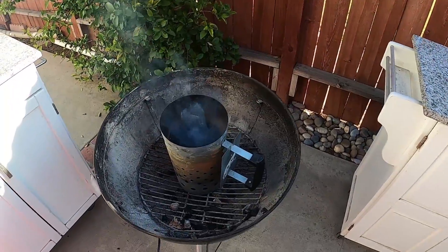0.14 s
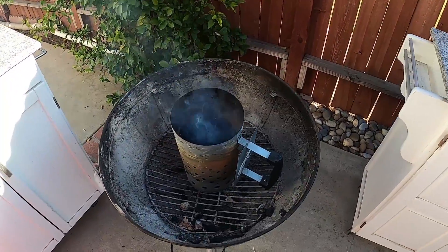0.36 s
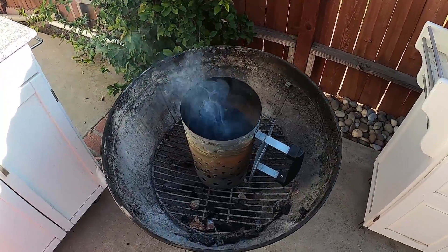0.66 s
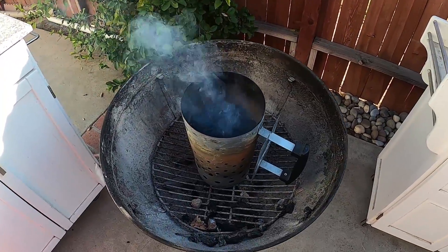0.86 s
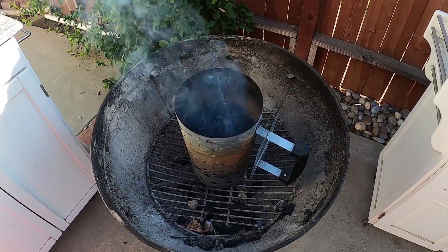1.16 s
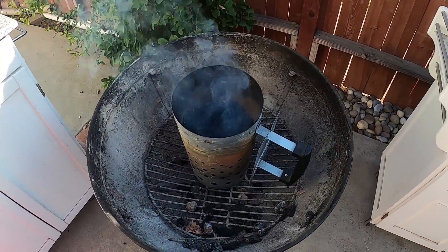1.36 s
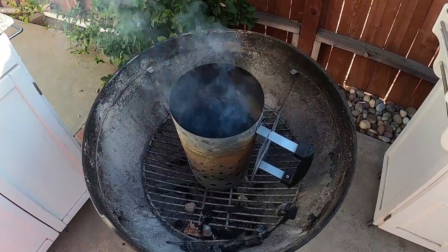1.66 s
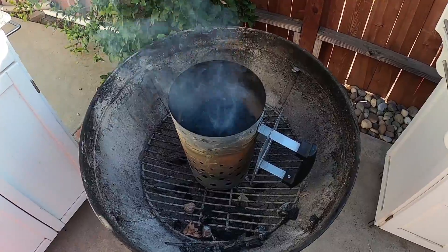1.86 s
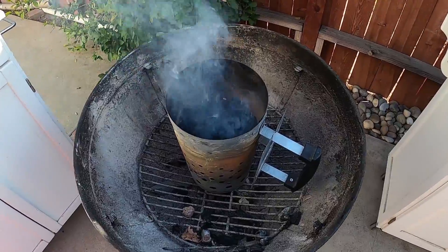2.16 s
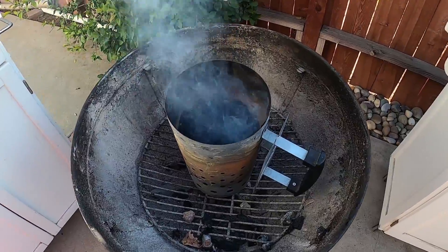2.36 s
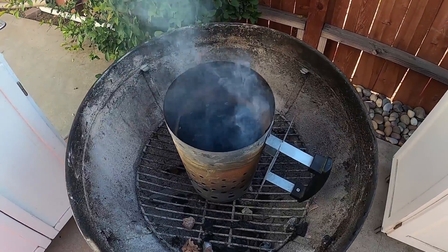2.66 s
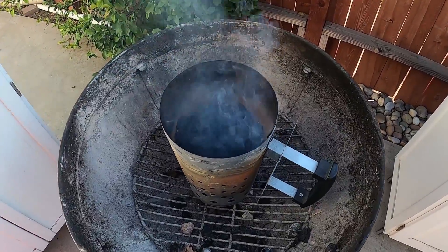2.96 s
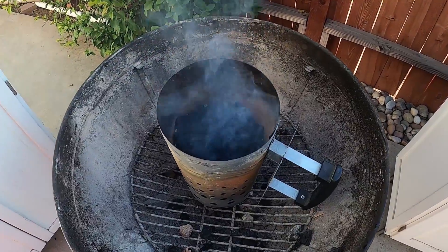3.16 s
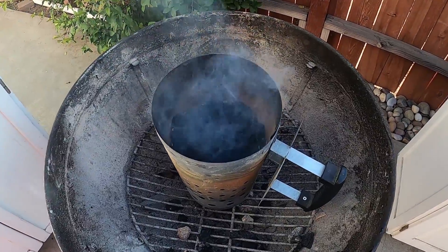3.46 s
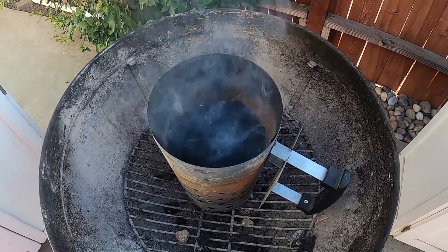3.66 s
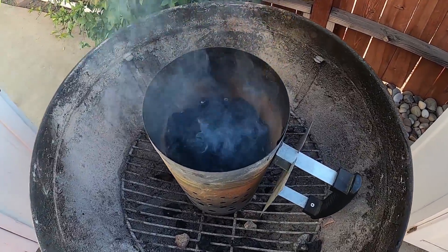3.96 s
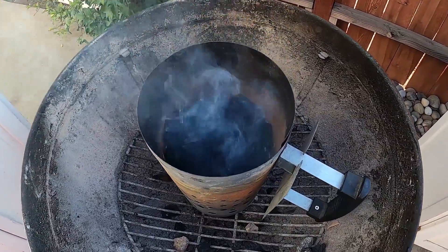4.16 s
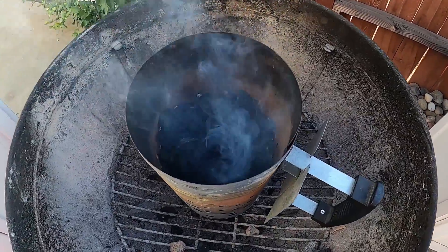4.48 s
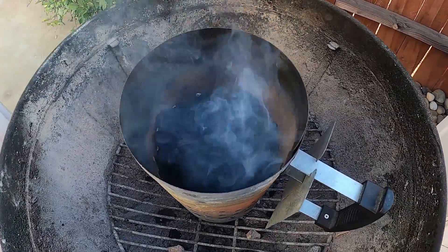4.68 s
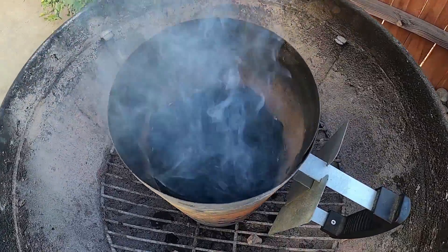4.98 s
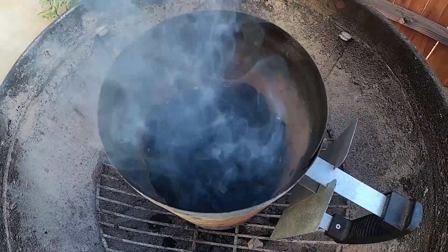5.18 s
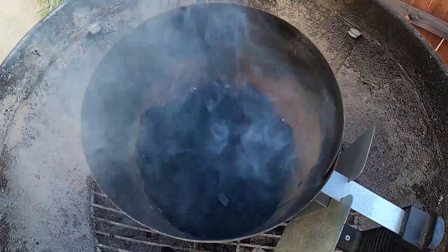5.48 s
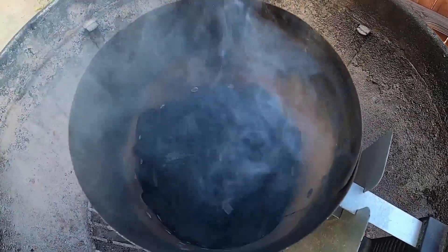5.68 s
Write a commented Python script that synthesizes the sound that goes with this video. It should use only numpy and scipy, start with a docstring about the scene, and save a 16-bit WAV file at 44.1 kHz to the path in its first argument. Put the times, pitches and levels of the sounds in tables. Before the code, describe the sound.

Charcoal snaps, ticks and tinkles in a metal chimney over a low outdoor rumble and distant motor hum, growing closer and hollower.

```python
"""A patio with a charcoal chimney starter: the microphone starts at a distance and leans in toward its mouth.
Behind lie filtered-noise rumble and wash and a distant motor's wavering tone; a soft draught and a faint sizzle
grow. Scuffs, and the fading tail of a knock at the very start, are gritty noise bursts, one with a ringing
metallic clack; soft knocks are short tones with a noise edge. Top coals snap (click, brief notes, echo); deeper
ones crack, crumble and tinkle as rough tones, tiny fractures and tube-shaped noise. Thin high pings, perhaps a
small mechanism near the microphone, sound one pure note."""
import sys
import numpy as np
from scipy import signal
from scipy.fft import rfft, irfft, next_fast_len
from scipy.io import wavfile
from scipy.ndimage import uniform_filter1d, map_coordinates

SR = 44100
rng = np.random.default_rng(int(sys.argv[2]) if len(sys.argv) > 2 else 0)


def transcribe(u):
    """Save the signal u as a 16-bit wav file named by the first command-line argument.

    u: samples, shape (n,) or (channels, n), limited to [-1, 1]; the rate is SR.
    q: integer samples, one column per channel.
    """
    v = np.clip(np.atleast_2d(u).T, -1, 1)
    q = np.round(v * 32767).astype(np.int16)
    wavfile.write(sys.argv[1], SR, q)


N = 257103

# Stereo likeness of the noises: (frequency [Hz], left-right correlation [-1 to 1])
STEREO_LIKENESS = [(25, 0.83), (80, 1), (250, 0.93), (500, 0.83), (1000, 0.65), (4000, 0.19), (8000, 0.65),
                   (12000, 0.68)]
# Left port over the right: (frequency [Hz], level [dB])
PORT_BALANCE = [(60, 0.5), (500, 1.4), (2700, 2), (4700, 1.4), (8000, -0.5), (11000, -2)]
# Phase by which the right port leads the left: (frequency [Hz], phase [rad])
PORT_LEAD = [(30, 0.12), (500, 0.043), (2000, 0.6), (4300, 0.94), (6000, 1.05), (8200, 1.26), (12000, 1.2)]
TOP_HZ = 15000  # nothing is kept from here up
# How far the microphone has leaned into the bowl: (time [s], share [0-1])
LEAN = [(0, 0), (2.3, 0.12), (3.3, 0.6), (4.6, 0.79), (5.1, 0.96), (5.55, 1)]
BEAMING = 4.26  # the tube sends its sound upward: it is heard as this power of the lean

# Outdoor rumble: (time [s], level [dB])
RUMBLE_LEVEL = [(0.0, -40), (0.9, -39.5), (1.6, -37), (2.3, -39.5), (2.8, -39), (4.3, -39.5), (5.0, -37.5),
                (5.83, -35.5)]
# Outdoor wash: (time [s], level [dB])
WASH_LEVEL = [(0.0, -52.5), (0.65, -54), (0.95, -50.5), (1.2, -53.5), (2.1, -51.5), (2.4, -56.5),
              (3.5, -54.5), (4.05, -56), (5.1, -57.5), (5.83, -58)]
# Spectra of the background noises, only their shape counts: (frequency [Hz], relative level [dB])
RUMBLE_SPECTRUM = [(12, -12), (25, -2.5), (40, 1), (58, 3.5), (80, -6), (110, -1), (150, -3), (200, -10.5),
                   (235, -13.5), (280, -30), (500, -64), (2000, -120)]
WASH_SPECTRUM = [(30, -65.5), (120, -21), (220, 4), (320, 4), (450, -4.5), (560, -5), (730, -10),
                 (830, -20), (1300, -31), (2000, -53.5), (8000, -92.5)]
WASH_IN_BOWL_SPECTRUM = [(30, -49.5), (120, -10.5), (220, -4.5), (290, 0.5), (380, 4), (430, 2), (480, 0.5),
                         (600, -2.5), (800, -9.5), (1300, -38.5), (2000, -45.5), (8000, -94.5)]
DRAUGHT_SPECTRUM = [(100, -61.5), (350, -15.5), (520, 1.5), (800, 4.5), (1350, 6.5), (1750, -3),
                    (2200, -9.5), (3000, -29.5), (6000, -40.5), (14000, -64.5)]
SIZZLE_SPECTRUM = [(200, -51.5), (1500, -9), (2700, -4), (3500, -5), (5000, -3), (6200, -4), (7900, -4.5),
                   (8700, -10), (9300, -14.5), (10100, -14.5), (11000, -28.5), (14000, -50), (20000, -75.5)]
# Hollow resonances of the air in chimney and bowl: (frequency [Hz], width [Hz], relative level [dB])
FLUE_MODES = [(480.6, 43, 14.5), (570, 120, 6.5), (770, 110, -3), (946, 58, 3), (1026.6, 10, 12.5),
              (1138, 59, 4), (1550, 280, -14)]
DRAUGHT_DB, DRAUGHT_NEAR_DB = -68.5, 9.5  # level before the lean, rise at full lean
SIZZLE_DB, SIZZLE_NEAR_DB = -73.5, 4  # likewise

# Distant motor: (time [s], pitch [Hz], fundamental level [dB], octave level [dB])
MOTOR = [(0.0, 82.05, -32, -54), (1.1, 83.34, -30, -48), (2.0, 83, -26.5, -43.5),
         (2.6, 83.94, -32.5, -47.5), (3.3, 83.64, -34, -56), (3.8, 83.7, -30.5, -55),
         (4.4, 84.16, -33.5, -64.5), (4.95, 83.74, -29.5, -53.5), (5.83, 83.87, -32, -51)]
# Brief dips in the level of the drone's fundamental: (time [s], depth [dB], half width at 1/e of the depth [s])
DRONE_DIPS = [(0.247, 25, 0.062), (0.58, 9.5, 0.055), (0.939, 29.5, 0.022), (1.252, 7.5, 0.027),
              (3.92, 8, 0.053), (4.125, 21, 0.039), (4.348, 20, 0.031), (4.51, 6.5, 0.04)]
# Faint distant whines: (frequency [Hz], level [dB], loudest time [s], half width at 1/e [s])
WHINES = [(374.7, -63.5, 2.53, 1.84), (417, -64, 1.3, 0.45), (317.3, -62, 2.4, 0.6)]

# Scuffs on the paving, the first row being the fading tail of a knock just before the start: (time [s], level
# [dB], decay time to -60 dB [s], rise time [s])
SCUFFS = [(0.0, -50.5, 0.29, 0.00061), (0.3548, -31.5, 0.051, 0.0092), (0.374, -56.5, 0.95, 0.0015),
          (0.474, -47.5, 0.028, 0.001), (0.57, -55, 0.014, 0.00043), (4.162, -57.5, 0.1, 0.004),
          (4.275, -60.5, 0.11, 0.0015)]
# Soft handling knocks: (time [s], level [dB], pitch [Hz], thud decay time to -60 dB [s], edge over level [dB])
KNOCKS = [(0.43, -45, 640, 0.043, -2.5), (4.6814, -32.5, 580, 0.011, -12), (4.8592, -39.5, 1117, 0.011, 2),
          (5.466, -54.5, 1200, 0.013, 12)]
# Spectra of scuff and knock edge: (frequency [Hz], relative level [dB])
SCUFF_SPECTRUM = [(200, -35), (500, 3), (1500, 9), (2500, 3), (3400, 1.5), (5000, -2.5), (6200, -3.5),
                  (7800, -7.5), (9300, -18), (10100, -21.5), (12000, -26.5), (15000, -45.5)]
KNOCK_SPECTRUM = [(100, -23), (400, -4), (1200, -2.5), (2600, -3), (4200, -5), (6000, -9.5), (9000, -21.5),
                  (15000, -53)]

# Thin high pings: (time [s], level [dB])
PINGS = [(0.589, -62), (0.873, -61.5), (1.043, -63), (1.208, -55.5), (1.2213, -47), (1.327, -37.5),
         (2.4742, -38), (2.554, -50), (2.72, -68), (3.0306, -38), (3.114, -47), (4.033, -60), (4.42, -53),
         (5.1587, -38.5), (5.1926, -47), (5.542, -56)]
PING_HZ = 7740

# Resonances of the loaded steel tube: (frequency [Hz], relative level [dB])
TUBE_MODES = [(3420, -7.5), (3570, -9), (3755, -7.5), (4170, -7.5), (4830, -11), (4965, 3), (6090, -8),
              (7100, -5), (7730, -2), (8085, 0), (8490, 0), (10100, -12)]
# Partials around a ring's main note: (frequency over its pitch [ratio], relative level [dB])
RING_PARTIALS = [(1, 13.5), (0.91, -8), (1.3, -5), (1.1, -12)]
# Notes of a bursting flake: (frequency over its pitch [ratio], relative level [dB])
FLAKE_NOTES = [(0.621, -9), (0.905, -2), (1.003, 2.5), (1.13, -11), (1.501, -11.5)]
# Spectra of crunch, fracture and click: (frequency [Hz], relative level [dB])
CRUNCH_SPECTRUM = [(100, -48), (1500, -3), (2600, -5), (3600, -9.5), (6200, -1.5), (8400, -6.5),
                   (9200, -8.5), (10100, -10), (11000, -10.5), (13000, -19), (15000, -39)]
FRACTURE_SPECTRUM = [(100, -50), (500, -40.5), (1800, -18.5), (2900, -17.5), (4200, -11), (5200, -5.5),
                     (7800, 4.5), (8800, -2.5), (10000, -7), (12500, -2), (15000, -28.5)]
CLICK_SPECTRUM = [(100, -31), (1500, -11.5), (3000, -13), (5000, 0.5), (8000, 3), (9000, -2), (12500, -6.5),
                  (15000, -17.5)]
# Bursts of fine crackle: (time [s], length [s], pitch [Hz], level [dB])
CRUMBLES = [(0.358, 0.02, 3340, -47.5), (1.12, 0.03, 5600, -70), (2.146, 0.043, 5160, -70.5),
            (2.234, 0.06, 5100, -69), (2.357, 0.026, 6360, -66), (2.635, 0.025, 6400, -65.5),
            (3.511, 0.05, 5870, -68), (3.602, 0.019, 5500, -67), (4.159, 0.027, 6200, -59),
            (4.276, 0.015, 3980, -52), (4.345, 0.03, 5400, -64.5), (4.571, 0.051, 5430, -57.5),
            (4.715, 0.029, 5400, -62.5), (4.773, 0.034, 5900, -66), (4.812, 0.04, 5530, -55.5),
            (4.878, 0.028, 4400, -57.5), (4.979, 0.032, 5400, -59), (5.065, 0.037, 5720, -61.5),
            (5.156, 0.054, 4340, -63), (5.595, 0.06, 5950, -63.5), (5.688, 0.031, 4300, -60)]
# Cracks down in the tube; the first four rows are the ring of a metallic clack within the scuff:
# (time [s], pitch [Hz], ring level [dB], crunch level [dB], ring decay to -60 dB [s])
CLACK_AND_CRACKS = [(0.355, 6000, -46, -52, 0.06), (0.368, 6200, -47.5, -55, 0.1),
                    (0.371, 4900, -47, -51, 0.11), (0.369, 10000, -58, -72, 0.11),
                    (0.737, 4900, -73, -80, 0.2), (1.2954, 4130, -51.5, -57, 0.15),
                    (1.332, 4108, -61, -66, 0.13), (1.412, 7980, -64.5, -71, 0.12),
                    (1.806, 8510, -56, -61, 0.12), (1.807, 3500, -61.5, -80, 0.1),
                    (1.837, 8500, -58.5, -67, 0.12), (1.991, 9930, -61, -74, 0.063),
                    (2.149, 4962, -62, -67, 0.08), (2.167, 4450, -64.5, -71, 0.08),
                    (2.244, 5370, -65, -69, 0.1), (2.358, 3490, -72, -78, 0.1),
                    (2.376, 4850, -60, -80, 0.13), (2.476, 4020, -69, -73, 0.1),
                    (2.91, 6100, -63.5, -72, 0.1), (2.9612, 8560, -65, -60, 0.096),
                    (3.033, 4070, -70, -77, 0.1), (3.123, 6580, -52.5, -64, 0.082),
                    (3.123, 9500, -63, -70, 0.11), (3.163, 8620, -61, -61, 0.1),
                    (3.166, 3590, -67, -80, 0.093), (3.2347, 3784, -65, -67, 0.099),
                    (3.282, 6500, -64.5, -64, 0.11), (3.3, 8280, -56.5, -64, 0.077),
                    (3.446, 6000, -52, -68, 0.14), (3.6496, 4060, -53, -73, 0.12),
                    (4.274, 3750, -46, -52, 0.17), (4.281, 4950, -54, -59, 0.25),
                    (4.277, 8440, -55, -59, 0.11), (4.758, 6076, -62, -74, 0.25),
                    (4.974, 6200, -54.5, -66, 0.079), (4.984, 8060, -58.5, -66, 0.08),
                    (5.521, 9900, -69, -71, 0.08), (5.59, 9930, -65, -59.5, 0.13),
                    (5.6915, 8006, -42, -55, 0.081), (5.692, 3430, -55.5, -64, 0.099)]
# Dry snaps of the top coals: (time [s], pitch [Hz], body level [dB], high note level [dB], click level [dB])
SNAPS = [(0.118, 7100, -61, -66, -68.5), (0.2068, 6630, -55, -64, -63), (0.315, 6860, -49, -54, -65),
         (0.5152, 5450, -52.5, -53, -60), (0.701, 6770, -62, -66, -70.5), (0.916, 6800, -64, -61, -72),
         (1.011, 5600, -64, -61, -67.5), (1.0768, 4940, -60.5, -75, -63.5), (1.114, 6730, -62, -61, -62.5),
         (1.199, 5160, -66, -70, -63.5), (1.228, 4900, -58, -60, -64), (1.2942, 4800, -28, -30.5, -40.5),
         (1.453, 7000, -56, -64, -68), (1.499, 5500, -59, -73, -66.5), (1.557, 5280, -43, -58, -49),
         (1.9574, 7270, -52.5, -62, -61.5), (2.139, 6850, -52.5, -56, -60.5), (2.1988, 6580, -51, -62, -62),
         (2.209, 5460, -50.5, -51, -56.5), (2.2602, 4300, -52.5, -74, -69.5),
         (2.855, 7150, -67, -74, -62.5), (3.013, 6404, -65, -72, -62), (3.0302, 5600, -53, -70, -62),
         (3.35, 6940, -55.5, -68, -68), (3.445, 6530, -49, -64, -62.5), (3.638, 6000, -54, -68, -58.5),
         (3.6457, 6100, -43.5, -38.5, -51), (3.776, 6760, -37.5, -40, -52), (3.917, 5940, -58, -58, -60.5),
         (4.1893, 5400, -52, -59, -62), (4.4033, 5400, -45.5, -38.5, -47),
         (4.8323, 6830, -44.5, -41.5, -52), (5.207, 4860, -48, -48, -48.5), (5.307, 6900, -56, -63, -66),
         (5.342, 6940, -52.5, -62, -66), (5.415, 7100, -56.5, -66, -69), (5.739, 6300, -59, -60, -59.5),
         (5.756, 7100, -57, -60, -63)]
SNAP_HIGH_HZ = 7530  # the high note that the snaps share


def amp(db):
    """Decibels to gain."""
    return 10 ** (np.asarray(db) / 20)


def unit(x):
    """x scaled to rms 1."""
    return x / np.sqrt(np.mean(x ** 2) + 1e-20)


def along(points, hz):
    """Read (frequency [Hz], value) points on a log frequency axis."""
    f, values = np.transpose(points)
    return np.interp(np.log(hz + 1), np.log(f + 1), values)


def curves(rows):
    """One value per sample for each column after the time."""
    times, *columns = np.transpose(rows)
    return [np.interp(np.arange(N) / SR, times, column) for column in columns]


def wobble(rate):
    """A smooth random curve with rate knots a second."""
    knots = rng.standard_normal(int(N * rate / SR) + 4)
    return map_coordinates(knots, [np.arange(N) * rate / SR])


def jagged(size, rate):
    """A random curve of straight lines between rate knots a second."""
    return np.interp(np.arange(size) * rate / SR, np.arange(1000), rng.standard_normal(1000))


def flutter(size, depth_db, rate=450):
    """A fast random swelling, as of many overlapping reflections."""
    return amp(depth_db * jagged(size, rate))


def peak(f, centre_hz, width_hz):
    """Gain of one resonance."""
    return 1 / (1 + (2 * (f - centre_hz) / width_hz) ** 2)


def peaks(f, notes, width_hz):
    """Summed gain of equally wide resonances at (frequency [Hz], gain) notes."""
    return sum(gain * peak(f, hz, width_hz) for hz, gain in notes)


def noise(gain, size):
    """Stereo noise of rms 1 with a gain per frequency; a shared and an opposed part set the ports' likeness."""
    m = next_fast_len(size + 2048)
    hz = np.fft.rfftfreq(m, 1 / SR)
    turn = np.arccos(np.clip(along(STEREO_LIKENESS, hz), -1, 1)) / 2
    spectra = rfft(rng.standard_normal((2, m))) * gain(hz) * [np.cos(turn), np.sin(turn)]
    mid, side = irfft(spectra, m)[:, :size]
    return unit(np.array([mid + side, mid - side]))


def coloured(spectrum, size=N):
    """Stereo noise shaped by (frequency [Hz], level [dB]) points."""
    return noise(lambda hz: amp(along(spectrum, hz)), size)


def patchy(x, depth_db):
    """Noise broken into brief patches of random strength, as from many tiny vents."""
    z = signal.stft(x, nperseg=256)[2]
    field = uniform_filter1d(rng.standard_normal(z.shape[1:]), size=4, axis=0)  # along frequency
    field = uniform_filter1d(field, size=7, axis=1)  # along time
    return unit(signal.istft(z * amp(depth_db * unit(field)), nperseg=256)[1][:, :N])


def rough_tone(hz, size, turns, rate=500):
    """A tone of rms 1 whose phase is jostled at random, by turns cycles."""
    return unit(np.sin(2 * np.pi * (hz * np.arange(size) / SR + turns * jagged(size, rate))))


def dying(t, t60, attack):
    """A rise multiplied by an exponential decay of 60 dB in t60 seconds."""
    return amp(-60 * t / max(t60, 1e-3)) * (1 - np.exp(-t / attack))


def add(track, s, sound):
    """Mix a sound into the track at time s."""
    start = min(max(round(s * SR), 0), N)
    track[:, start:start + sound.shape[1]] += sound[:, :N - start]


def scattered(count, range_db, low_hz, high_hz):
    """Strew small, mostly weak events over the whole time: (time [s], below the strongest [dB], pitch [Hz])."""
    when, size, pitch = rng.random((count, 3)).T
    times = (np.arange(count) + when) / count * N / SR
    return zip(times, range_db * np.sqrt(size), low_hz + (high_hz - low_hz) * pitch)


def nearness():
    """The lean into the bowl, and how far that brings the microphone into the tube's beam, both 0-1."""
    near = np.clip(curves(LEAN)[0], 0, 1)
    return near, near ** BEAMING


def outdoor_rumble():
    """Low noise of the open air, its level drifting slowly."""
    return amp(curves(RUMBLE_LEVEL)[0] + 1.4 * wobble(7)) * coloured(RUMBLE_SPECTRUM)


def outdoor_wash():
    """Broad noise of the yard; the bowl's reflection hollows it as the microphone leans in."""
    near, _ = nearness()
    yard = np.sqrt(1 - near) * coloured(WASH_SPECTRUM) + np.sqrt(near) * coloured(WASH_IN_BOWL_SPECTRUM)
    return amp(curves(WASH_LEVEL)[0] + 1.1 * wobble(11)) * yard


def drone():
    """A far motor's fundamental and weak octave; a constant waver tells most where the drone is faint."""
    hz, level_db, octave_db = curves(MOTOR)
    t = np.arange(N) / SR
    dip_db = sum(depth_db * np.exp(-((t - s) / width) ** 2) for s, depth_db, width in DRONE_DIPS)
    phase = 2 * np.pi * np.cumsum(hz) / SR + 0.23 * wobble(6.3)
    waver = wobble(17) * np.sin(phase) + 0.085 * wobble(17) * np.cos(phase)
    steady = amp(level_db) * unit(np.sin(phase))
    fundamental = amp(-dip_db) * (steady + amp(-45) * unit(waver))
    octave = unit(np.sin(2 * phase + 1.1 * wobble(7.2)))
    return fundamental + amp(octave_db + 2.2 * wobble(10)) * octave


def distant_whines():
    """Faint tones, jostled in phase and level, that swell and fade."""
    t, out = np.arange(N) / SR, np.zeros(N)
    for hz, db, s, width in WHINES:
        tone = unit(np.sin(2 * np.pi * hz * t + wobble(9.3)))
        out += amp(db + 0.97 * wobble(4.8)) * np.exp(-((t - s) / width) ** 2) * tone
    return out


def draught():
    """Soft air noise and the hollow resonances of chimney and bowl, growing as the mouth comes near."""
    _, beam = nearness()
    hollow = noise(lambda f: sum(amp(db) * peak(f, hz, width) for hz, width, db in FLUE_MODES), N)
    level_db = DRAUGHT_DB + DRAUGHT_NEAR_DB * beam + 1.1 * wobble(12)
    return amp(level_db) * (coloured(DRAUGHT_SPECTRUM) + hollow)


def sizzle():
    """Patchy high noise of the embers with slow and fast level changes, growing as the mouth comes near."""
    _, beam = nearness()
    level_db = SIZZLE_DB + SIZZLE_NEAR_DB * beam + 1.8 * wobble(25) + 0.3 * wobble(430)
    return amp(level_db) * patchy(coloured(SIZZLE_SPECTRUM), depth_db=2.0)


def scuffs():
    """Shoes scuff the gritty paving, and a knock just before the start fades out: decaying noise with a fast
    random roughness."""
    out, t = np.zeros((2, N)), np.arange(SR // 2) / SR
    for s, db, t60, rise in SCUFFS:
        grit = unit(flutter(len(t), depth_db=1.0, rate=900))
        add(out, s, amp(db) * coloured(SCUFF_SPECTRUM, size=len(t)) * dying(t, t60, rise) * grit)
    return out


def knocks(width_hz=700, edge_life=0.47):
    """Fingers knock softly near the microphone: a short thud with a noise edge of edge_life times its decay."""
    out, t = np.zeros((2, N)), np.arange(SR // 2) / SR
    for s, db, hz, t60, edge_db in KNOCKS:
        thud = 0.74 * np.sin(2 * np.pi * hz * t) + noise(lambda f: peak(f, hz, width_hz), size=len(t))
        edge = amp(edge_db) * coloured(KNOCK_SPECTRUM, size=len(t))
        knock = thud * dying(t, t60, 0.00034) + edge * dying(t, edge_life * t60, 0.00039)
        add(out, s, amp(db) * knock)
    return out


def ping(hold_s=0.0011, release_s=0.0066, click_db=-19, click_t60=0.033, echo_db=-27, echo_t60=0.16, width_hz=300):
    """A thin pure note starts with a tick, holds for an instant and fades, leaving a faint echo."""
    t = np.arange(SR // 8) / SR
    envelope = np.clip(1 - (t - hold_s) / release_s, 0, 1) * (1 - np.exp(-t / 0.00023))
    note = np.sin(2 * np.pi * PING_HZ * t) * envelope
    tick = amp(click_db) * coloured(FRACTURE_SPECTRUM, size=len(t))[0] * dying(t, click_t60, 0.0002)
    echo = amp(echo_db) * noise(lambda f: peak(f, PING_HZ, width_hz), size=len(t))
    return note + tick + echo * dying(t, echo_t60, 0.004)


def tube_noise(hz, size, width_hz=45, broad_db=-15, reach=1.9, luck_db=0.5):
    """The tube's resonances, stirred most near the pitch hz and at random strengths each time."""
    luck = luck_db * rng.standard_normal(len(TUBE_MODES))
    modes = [(mode, amp(db + extra)) for (mode, db), extra in zip(TUBE_MODES, luck)]

    def gain(f):
        broad = amp(broad_db + along(CRUNCH_SPECTRUM, f))
        return (peaks(f, modes, width_hz) + broad) * peak(f, hz, reach * hz)

    return noise(gain, size=size)


def crumble(length, hz, count=150, spread=0.15, cycles=9, size_db=4.0, fall_db=9, rise_s=0.002, tube_db=-2):
    """A crust crumbles: a run of tiny fractures, each a few cycles at its own pitch, fading fall_db per length."""
    t = np.arange(int(3 * length * SR)) / SR
    life = np.arange(SR // 200) / SR  # time within one fracture
    when = rng.random(count)
    size, pitch = rng.standard_normal((count, 1)), rng.standard_normal((count, 1))
    turns = hz * np.exp(spread * np.clip(pitch, -2, 2)) * life
    grains = amp(size_db * size) * np.sin(2 * np.pi * turns) * turns * np.exp(-2 * turns / cycles)
    starts = ((np.arange(count) + when) / count * len(t)).astype(int)
    places = starts[:, None] + np.arange(len(life))
    fractures = unit(np.bincount(places.ravel(), grains.ravel(), len(t))[:len(t)])
    sound = unit(fractures + amp(tube_db) * tube_noise(hz, len(t)))
    return sound * amp(-fall_db * t / length) * (1 - np.exp(-t / rise_s))


def ringing_crack(hz, ring_db, crunch_db, t60, width_hz=190, scatter_db=-3, twin_ratio=0.968, twin_db=-12,
                  crunch_life=0.9, build_up_s=0.0018, grit_db=-7, grit_t60=0.089):
    """A lump splits or metal clacks: two close notes beat over crunching tube resonances, with a fast flutter."""
    t = np.arange(SR // 4) / SR
    partials = [(ratio * hz, amp(db)) for ratio, db in RING_PARTIALS]
    scatter = noise(lambda f: peaks(f, partials, width_hz) * amp(along(CRUNCH_SPECTRUM, f)), size=len(t))
    note = rough_tone(hz, len(t), turns=0.1, rate=200)
    twin = amp(twin_db) * rough_tone(twin_ratio * hz, len(t), turns=0.13, rate=200)
    ring = amp(ring_db) * unit(note + twin + amp(scatter_db) * scatter)
    crunch = amp(crunch_db) * tube_noise(hz, len(t))
    # the onset is a short gritty burst around the pitch
    grit = noise(lambda f: peak(f, hz, hz / 4) * amp(along(CRUNCH_SPECTRUM, f)), size=len(t))
    sound = ring * dying(t, t60, build_up_s) + crunch * dying(t, crunch_life * t60, build_up_s)
    sound = sound + amp(ring_db + grit_db) * grit * dying(t, grit_t60, build_up_s)
    return sound * flutter(len(t), depth_db=1.0, rate=370)


def snap(hz, body_db, high_db, click_db, t60=0.018, click_t60=0.013, width_hz=680,
         echo_db=-24, echo_t60=0.16, click_echo_db=-20):
    """A flake bursts off: a click, the flake's brief notes and a high note, then a weak, ragged bowl echo."""
    t, rise = np.arange(SR // 8) / SR, 0.0004
    click = amp(click_db) * coloured(CLICK_SPECTRUM, size=len(t))
    notes = [(ratio * hz, amp(db + along(FRACTURE_SPECTRUM, ratio * hz))) for ratio, db in FLAKE_NOTES]
    body = amp(body_db) * unit(sum(gain * rough_tone(f, len(t), turns=0.25) for f, gain in notes))
    high = amp(high_db) * rough_tone(SNAP_HIGH_HZ, len(t), turns=0.33) / np.sqrt(2)
    direct = click[0] * dying(t, click_t60, rise) + (body + high) * dying(t, t60, rise)
    body_echo = amp(body_db + echo_db) * noise(lambda f: peaks(f, notes, width_hz), size=len(t))
    high_echo = amp(high_db + echo_db) * noise(lambda f: peak(f, SNAP_HIGH_HZ, width_hz), size=len(t))
    echo = body_echo + high_echo + amp(click_echo_db) * click
    return direct + echo * dying(t, echo_t60, 0.0039) * flutter(len(t), depth_db=4.0)


def small_coals(tick_db=-60.0, tinkle_db=-67, crumble_db=-71, tick_t60=0.024, tinkle_t60=0.11,
                life_spread=0.59, near_db=4):
    """Faint ticks, tinkles and runs of crackle at random moments, louder as the microphone nears."""
    out = np.zeros((2, N))
    for s, below, hz in scattered(count=70, range_db=6.5, low_hz=4480, high_hz=7850):
        db = tick_db - below
        click_db = db - 12 + 4 * rng.standard_normal()
        add(out, s, snap(hz, db, db - 8, click_db, t60=tick_t60 * rng.lognormal(0, life_spread)))
    for s, below, hz in scattered(count=40, range_db=8.0, low_hz=3970, high_hz=8400):
        db = tinkle_db - below
        add(out, s, ringing_crack(hz, db - 2, db, tinkle_t60 * rng.lognormal(0, life_spread)))
    for s, below, hz in scattered(count=30, range_db=5, low_hz=4200, high_hz=7200):
        add(out, s, amp(crumble_db - below) * crumble(0.022, hz, count=30))
    near, _ = nearness()
    return out * amp(near_db * near)


def loud_events():
    """The pings, the clack, and the coals' crumbling, cracks and snaps that stand out, at their listed times."""
    out = np.zeros((2, N))
    for s, db in PINGS:
        add(out, s, amp(db) * ping())
    for s, length, hz, db in CRUMBLES:
        add(out, s, amp(db) * crumble(length, hz))
    for s, hz, ring_db, crunch_db, t60 in CLACK_AND_CRACKS:
        add(out, s, ringing_crack(hz, ring_db, crunch_db, t60))
    for s, hz, body_db, high_db, click_db in SNAPS:
        add(out, s, snap(hz, body_db, high_db, click_db))
    return out


def scene():
    """The patio from the open air behind to the events in front."""
    background = outdoor_rumble() + outdoor_wash() + drone() + distant_whines()
    chimney_air = draught() + sizzle()
    handling = scuffs() + knocks()
    return background + chimney_air + handling + small_coals() + loud_events()


def record(dry):
    """The right port hears everything a little early and favours the treble; a band limit cuts the top."""
    t = np.arange(N) / SR
    ends = np.minimum(np.minimum(t, t[::-1]) / 0.004, 1)  # 4 ms fades
    m = next_fast_len(N + SR // 2)
    hz = np.fft.rfftfreq(m, 1 / SR)
    side = np.array([[0.5], [-0.5]])  # left, right
    ports = amp(side * along(PORT_BALANCE, hz)) * np.exp(-1j * side * along(PORT_LEAD, hz))
    return irfft(rfft(dry * ends, m) * ports * (hz < TOP_HZ), m)[:, :N]


dry = scene()
out = record(dry)
transcribe(out)
```